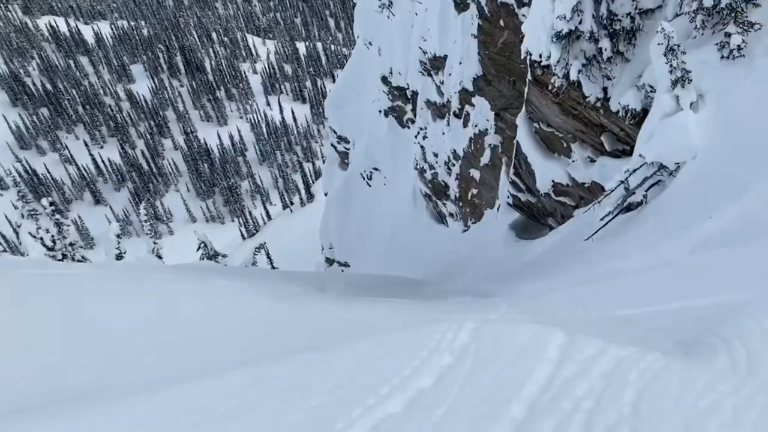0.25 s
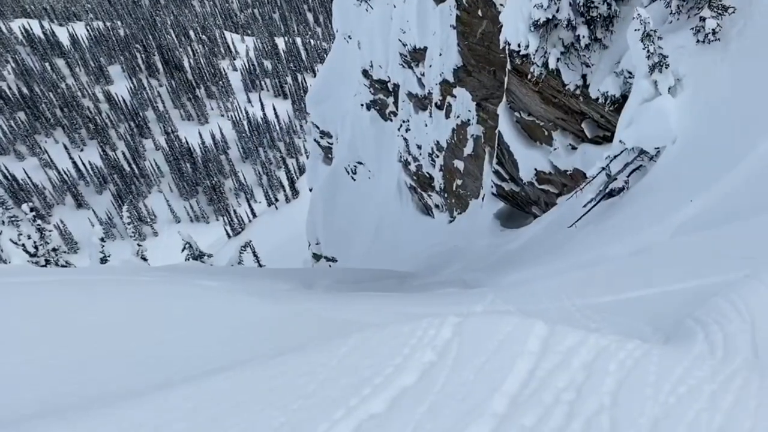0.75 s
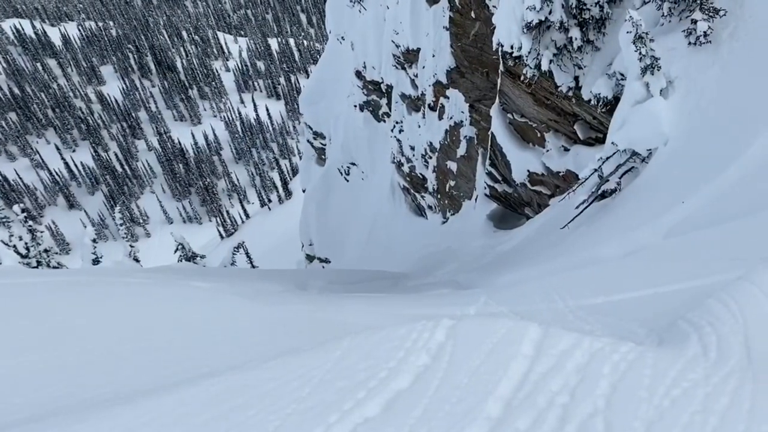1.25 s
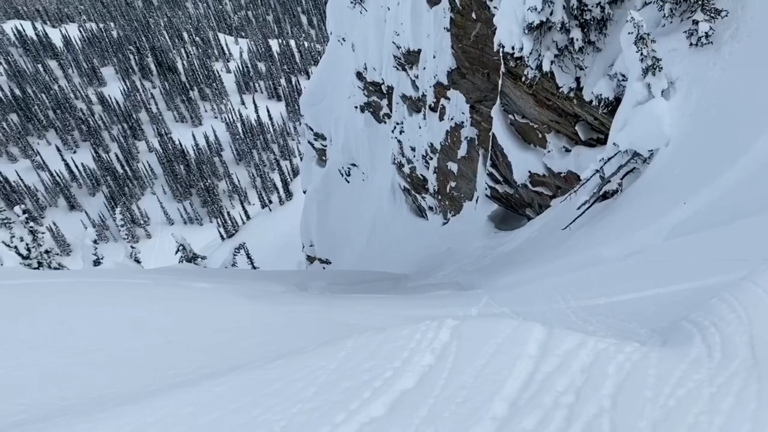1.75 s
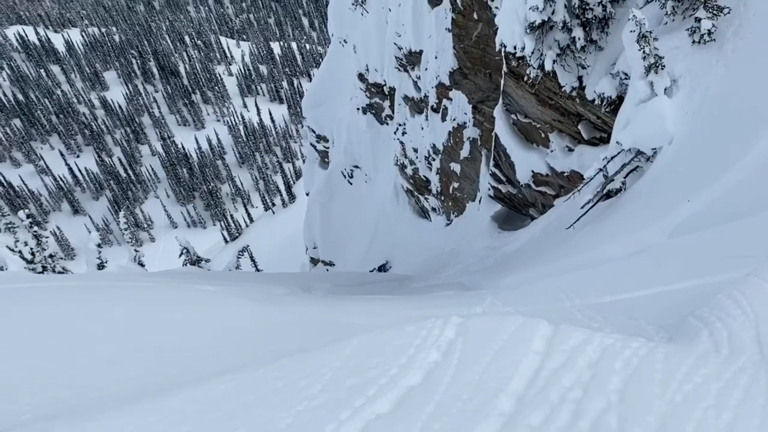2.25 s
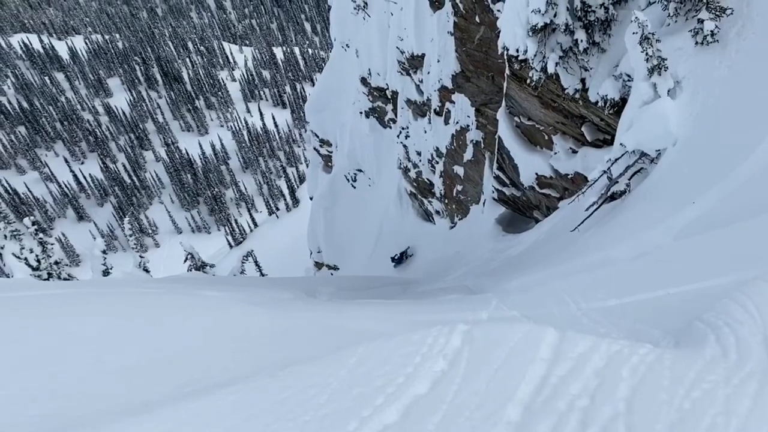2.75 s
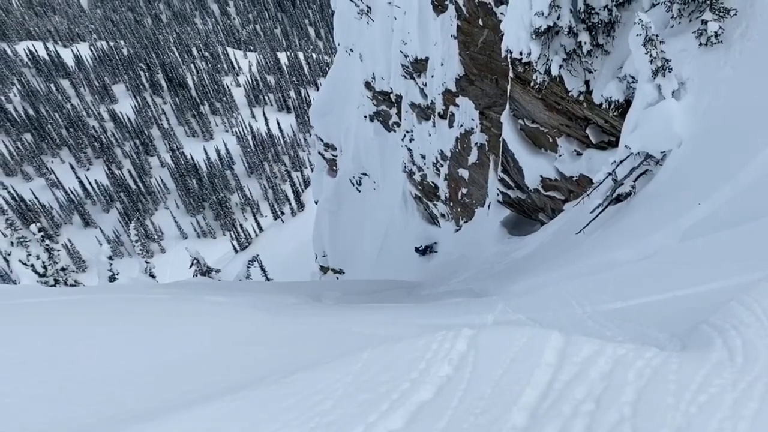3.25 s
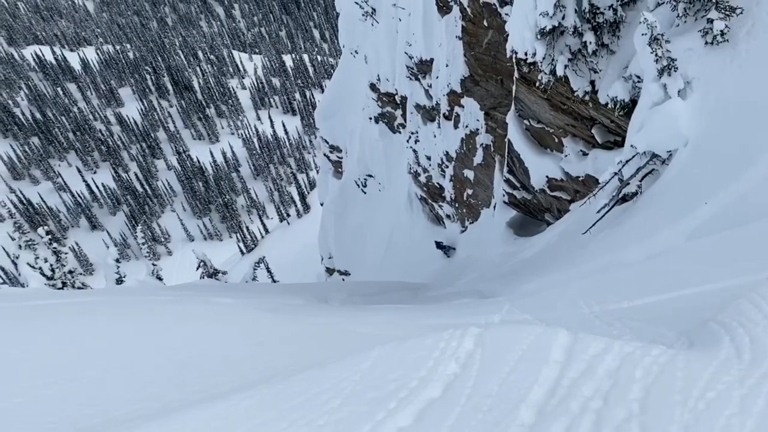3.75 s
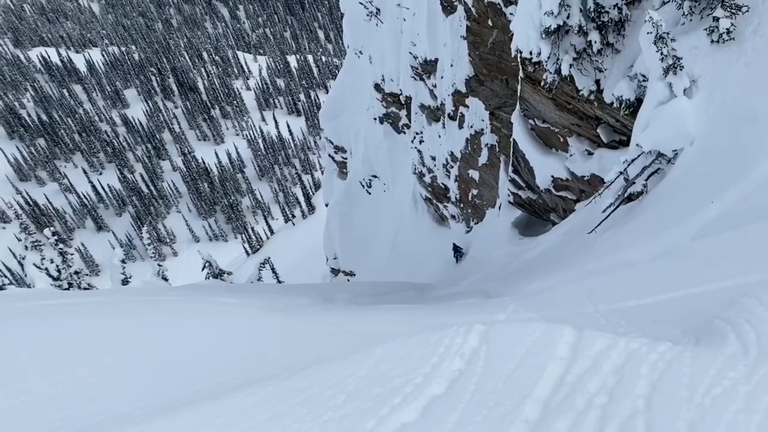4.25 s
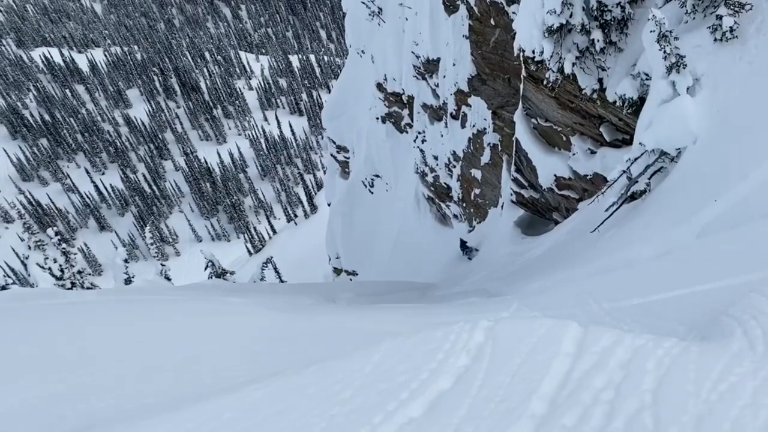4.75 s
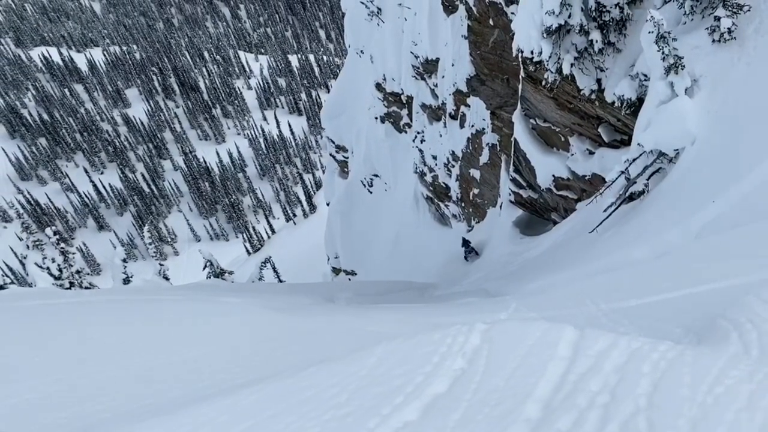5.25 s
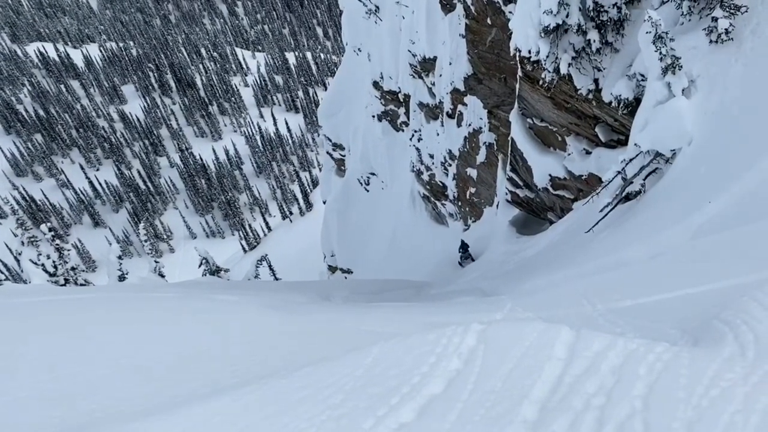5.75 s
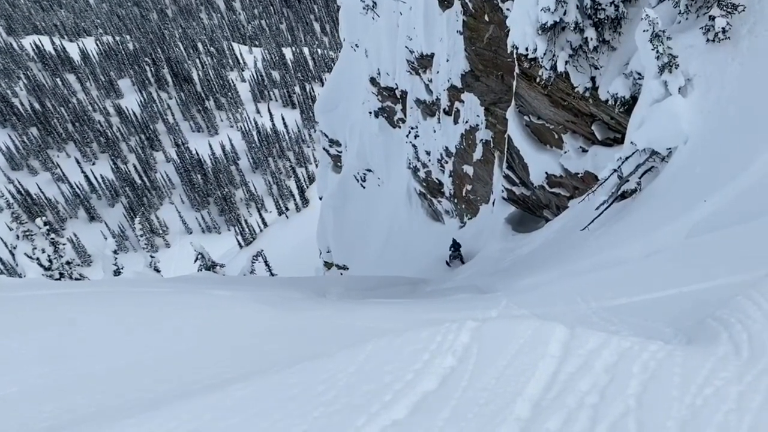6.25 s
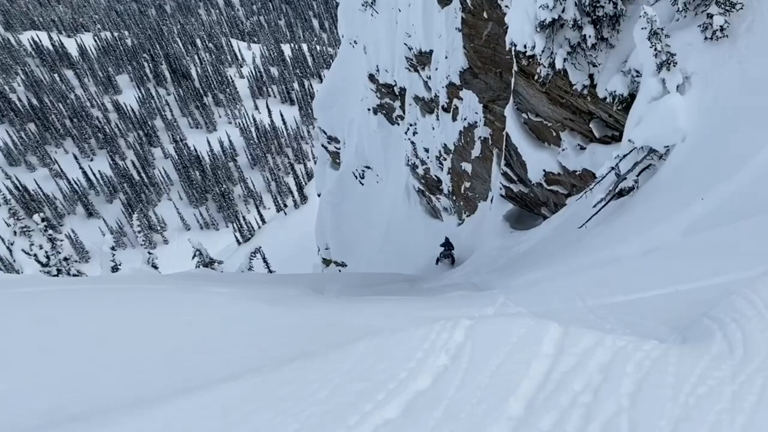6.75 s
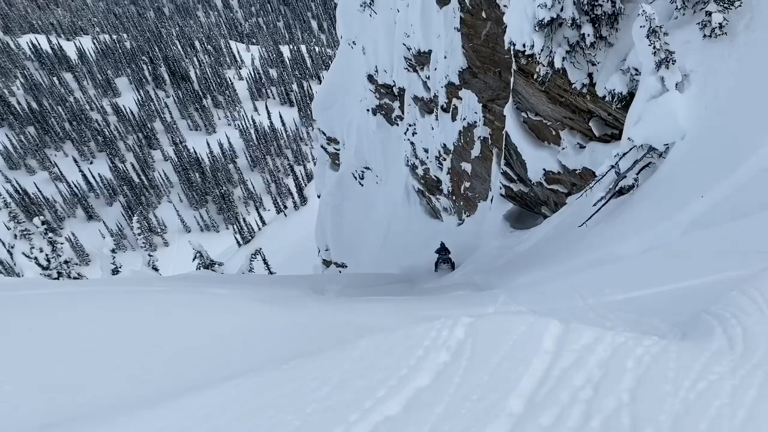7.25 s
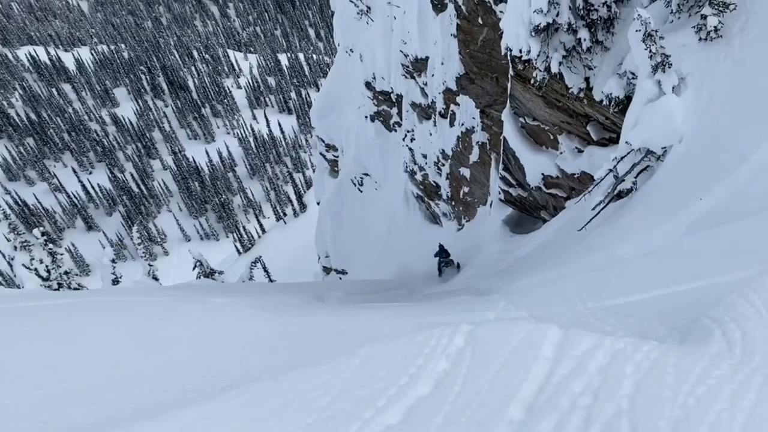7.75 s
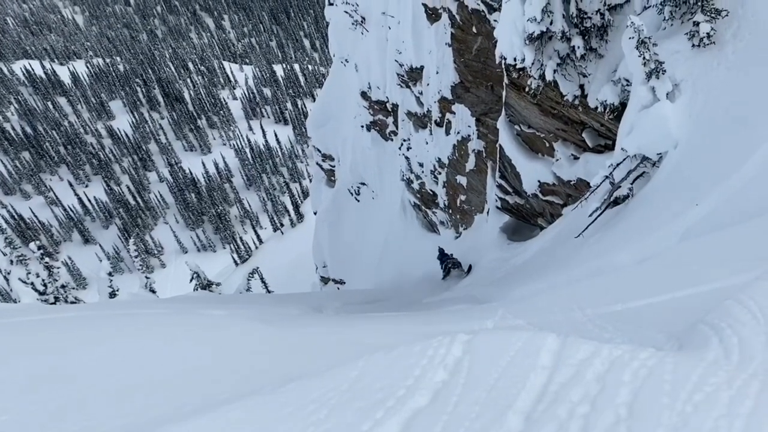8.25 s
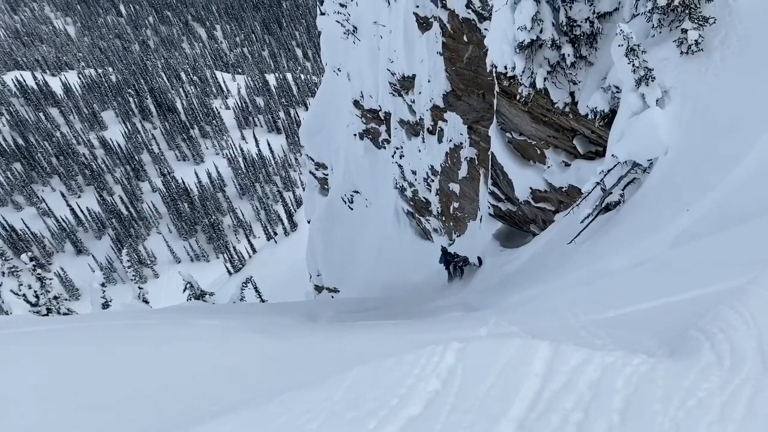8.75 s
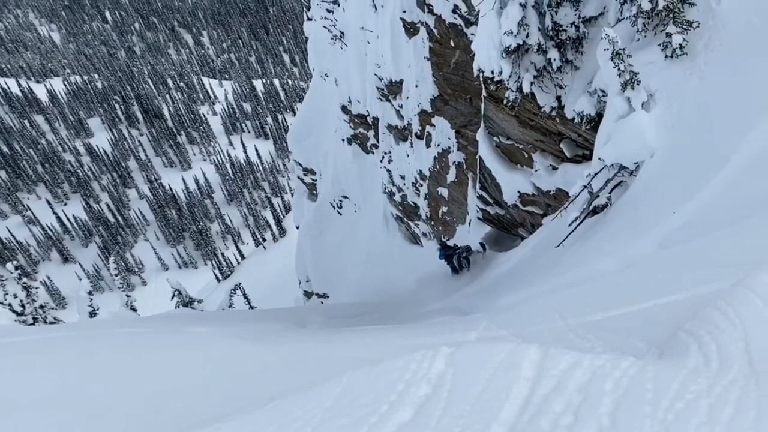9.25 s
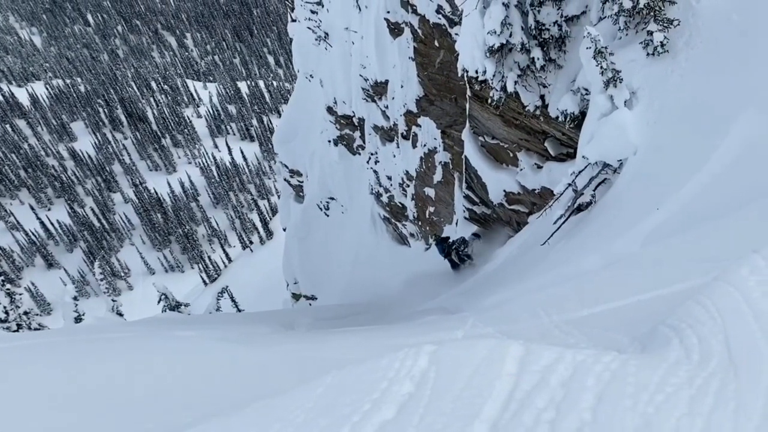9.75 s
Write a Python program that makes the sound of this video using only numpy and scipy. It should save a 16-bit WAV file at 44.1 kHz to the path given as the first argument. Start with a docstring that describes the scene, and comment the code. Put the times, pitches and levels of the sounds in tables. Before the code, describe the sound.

One continuous engine: a buzzing, nasal two-stroke scream heard from far off across a snowy gully. Its overtones flutter and fade in the moving air, with gritty exhaust noise and a faint track hum underneath. Brief dips in revs interrupt it throughout, each recovering quickly. A blurred echo off rock thickens the middle. Small low wind thumps touch the two-port microphone near the start.

```python
"""A snowy gully: a two-cylinder two-stroke snowmobile climbs at full revs, far below the listener.
Its exhaust is a periodic pulse train with gated gas noise; a rock face adds an echo, the track a hum of sines.
Unsteady air makes each overtone swell and fade before the sound reaches two close microphone ports.
Low-passed noise makes the light wind that thumps the ports."""
import sys
import numpy as np
from scipy import signal
from scipy.fft import rfft, irfft, next_fast_len
from scipy.io import wavfile
from scipy.ndimage import uniform_filter1d, map_coordinates

SR = 44100
rng = np.random.default_rng(int(sys.argv[2]) if len(sys.argv) > 2 else 0)


def wrap_up_sound(samples):
    """Save the sound to the file named by the first command line argument, as 16-bit audio."""
    columns = np.atleast_2d(samples).T
    # keep every value between -1 and 1, then stretch to whole-number steps
    tamed = np.clip(columns, -1, 1)
    steps = np.round(tamed * 32767).astype(np.int16)
    wavfile.write(sys.argv[1], SR, steps)


N = 441000  # samples, 10 s

# Exhaust arriving at open throttle:
# (time [s], pipe note near 800 Hz [dB], bark 1.2-3 kHz [dB], rasp above 3 kHz [dB])
EXHAUST = [(0.0, -39, -46, -44), (.6, -28.5, -41, -42), (.86, -25.5, -31.5, -42), (1.4, -16, -31, -42.5),
           (1.64, -13.5, -40, -44.5), (1.82, -27.5, -35, -43.5), (1.98, -15, -39, -43.5),
           (2.35, -34, -36.5, -37.5), (2.47, -28.5, -36, -34.5), (2.57, -27.5, -29.5, -27.5),
           (2.64, -17, -26, -23), (2.85, -18.5, -26.5, -25), (3.15, -15, -27, -28), (3.27, -26.5, -30, -34),
           (3.86, -24, -21.5, -28), (4.25, -31, -32.5, -31), (4.6, -40.5, -37.5, -36.5),
           (4.85, -37, -34, -37.5), (5.3, -27.5, -24.5, -22.5), (5.9, -28.5, -38.5, -36),
           (6.45, -27, -23.5, -24), (6.85, -21.5, -28.5, -24), (7.1, -34, -25.5, -22.5),
           (7.55, -29.5, -34.5, -31), (7.75, -30, -28, -26), (8.1, -26, -25, -26), (8.5, -26, -30, -25),
           (8.62, -23.5, -34, -33.5), (8.76, -28, -26, -33), (8.84, -29.5, -25.5, -26.5),
           (9.5, -27, -23.5, -31.5), (10.0, -17, -26, -30.5)]
# Pipe colour on top of those levels: (frequency [Hz], level per overtone [dB])
PIPE_COLOUR = [(1150, -2.5), (1300, -7), (2100, -6.5), (2900, -11), (3800, -5.5), (5900, -15.5),
               (8000, -27), (11500, -45.5), (14000, -39), (16000, -74)]
# Gas roar against the overtones: (frequency [Hz], level [dB])
GAS_ROAR = [(150, -29), (400, -24), (1000, -15.5), (2500, -12.5), (4200, -16), (6000, -8), (9000, 5)]
# Spectral shape of the wind rumble: (frequency [Hz], relative level per Hz [dB])
WIND_RUMBLE = [(20, -0.5), (50, 19), (100, -3.5), (170, -19.5), (500, -47.5)]
# Phase between the ports: (frequency [Hz], lead of the left [rad])
PORT_LEAD = [(100, 0), (690, .3), (1980, .2), (2670, 1.1), (4820, 2.1), (5430, 1.2), (7900, 3.05),
             (11800, np.pi), (14000, 4.2), (15300, 6.2)]
# Level between the ports: (frequency [Hz], left minus right [dB])
PORT_LEAN = [(60, 0), (200, -3), (700, -4.5), (1290, -1.8), (4400, -1), (6500, 0)]
# Part of the sound unrelated between the ports: (frequency [Hz], level [dB])
PORT_APART = [(200, -24), (3000, -19), (6000, -10), (8500, -22), (11500, -22), (13500, 2)]
# The firing note itself, the first overtone: (time [s], level [dB])
FIRING_NOTE = [(0.0, -41), (.2, -43.5), (.95, -33), (1.64, -33.5), (2.15, -46), (3.1, -38), (4.6, -42),
               (5.18, -40), (7.6, -36), (10.0, -33.5)]
# Firing rate that the open throttle pulls toward: (time [s], rate [Hz])
OPEN_RATE = [(0.0, 274.7), (0.21, 265.7), (0.78, 260.5), (0.94, 271.6), (1.39, 270.6), (1.95, 275.1),
             (2.38, 262.1), (2.7, 277.1), (2.87, 273.7), (3.01, 277.9), (3.36, 269.6), (3.92, 282.7),
             (4.29, 285.4), (5.12, 283.1), (5.28, 277), (5.5, 280.2), (5.9, 270.8), (6.56, 277.5),
             (7.75, 277.9), (8.3, 270.7), (8.71, 263), (9.36, 255.7), (9.9, 273.6)]
# The rider eases off or the track digs in:
# (time [s], length [s], sag of the firing rate [Hz], quietening of the exhaust [dB])
LIFTS = [(0.0, 0.1, 16.8, 9), (0.438, 0.059, 6.1, 7), (1.658, 0.07, 31.4, 15), (1.983, 0.063, 12, 10.5),
         (3.523, 0.11, 10.6, 4.5), (3.931, 0.14, 12.3, 3), (4.372, .17, 40, 9.5), (4.708, 0.1, 17, 13.5),
         (6.544, 0.14, 13.5, 9.5), (6.891, 0.26, 14, -0.5), (7.902, 0.087, 17.7, 17.5),
         (8.918, 0.08, 8.3, 9.5), (9.166, 0.11, 8, 6.5)]
# Overtones beside the pipe note: (time [s], second over the mean of note and bark [dB],
# fourth over the same mean [dB], fifth over the bark [dB])
BESIDE_NOTE = [(0, 4, -3, 15), (.4, -3, -12.5, 7.5), (.95, 3, 0.5, -7), (1.6, -6.5, -14.5, 4.5),
               (2.3, 2, -8, -5), (2.7, -3.5, -4, -6), (4.3, -4, 5, 1.5), (5.3, -4.5, -0.5, -2),
               (6, -9, -4.5, -7.5), (7.15, -7.5, -6.5, -3.5), (7.45, 2.5, -3.5, 1.5),
               (8.3, -14.5, -7, -2.5), (10, -6, -0.5, 4)]
# Upper colour: (time [s], 2.3-3.2 kHz over the mean of bark and rasp [dB], above 4.7 kHz over the rasp [dB])
UPPER_COLOUR = [(0, -2.5, -9), (1.3, 2.5, -0.5), (2.1, -0.5, -5.5), (2.7, 1.5, -3.5), (3.4, 1, -4.5),
                (4.4, 4, 9.5), (4.55, -11.5, -0.5), (5.1, 3, 3), (5.6, 7, 8.5), (7.4, -3, -1), (8.1, 2, 8),
                (9.3, 0.5, -5), (10, 3.5, 0)]
# Roughness: (time [s], gas roar below 1 kHz [dB], gas roar above [dB], phase drift of the upper overtones [rad])
ROUGHNESS = [(0, -4, 3, 2), (2.9, 0, 5.5, 1.5), (3.5, -3, 4, .5), (5, -5, 2, .15), (8.6, -6, 1.5, .15),
             (9.3, -4, 2, .7), (10, -3, 3, 1)]
# Hum of the track's drive lugs, at their own speed: (time [s], frequency [Hz], middle level [dB])
TRACK_HUM = [(.75, 120, -67), (.97, 131, -58), (1.7, 128, -54), (2.3, 110, -57.5), (3.17, 141.9, -54.5),
             (3.7, 115, -62.5), (4.4, 137.3, -64), (4.9, 117.6, -64.5), (5.65, 150.3, -54.5),
             (6.1, 125.5, -58), (7.0, 142.7, -65), (7.27, 126.4, -60), (7.9, 136.3, -56.5),
             (9.45, 121.3, -59), (10, 145.4, -50)]
# Harmonics of that hum, from the fundamental up: (level [dB])
LUG_HARMONICS = [0, 2, -10, -5]
# Echo from the rock face behind: (time [s], level against the straight sound [dB])
ROCK_ECHO = [(0, -21.5), (3.7, -17), (4.2, -7.5), (5.3, -11), (5.6, -14.5), (7.2, -10.5), (7.6, -14),
             (10, -17.5)]
# Flurries of wind on the ports: (time [s], length [s], middle level [dB], reach [Hz])
GUSTS = [(0, 0.18, -52, 90), (1.656, 0.54, -48, 190), (2.454, 0.45, -60, 100.7), (4.96, .5, -59, 100.6)]

RECOVER_S, LINGER_S = .319, .046  # the revs climb back; the hush outlasts the lift
CLOSE_S, OPEN_S = .048, .029  # the exhaust quietens, and returns
LOW_HUSH = .38  # share of the hush gained per overtone above the first
ROAR_HUSH = .62  # the gas roar loses only this share of the hush
NOTCH_HZ, NOTCH_WIDTH_HZ, NOTCH_DB = 4680, 216, 8  # a narrow gap in the treble
# echo: typical share of pitch lost, lag of its firing rate, loss per overtone above the third (up to three)
FLAT, LAG_S, DULL_DB = .028, .03, 2.5
FLUTTER = .5  # weight of the scattered sound in the three lowest tones
TOP_HZ = 15750
OVERTONES = 66
STFT = dict(nperseg=512, noverlap=384)


def amp(db):
    """Decibel law: the gain of a level in dB."""
    return 10 ** (np.asarray(db) / 20)


def unit(x):
    """Normalisation: x at rms 1."""
    return x / np.sqrt(np.mean(x ** 2) + 1e-20)


def along(points, hz):
    """Logarithmic pitch scale: (frequency, value) points read on a log axis."""
    f, v = np.transpose(points)
    return np.interp(np.log(hz + 1), np.log(f + 1), v)


def curves(rows, t):
    """Linear interpolation: each column after the time, read at times t."""
    s, *cols = np.transpose(rows)
    return np.array([np.interp(t, s, c) for c in cols])


def wobble(rate):
    """Band-limited fluctuation: a smooth random curve with rate knots a second."""
    knots = rng.standard_normal(int(N * rate / SR) + 4)
    return map_coordinates(knots, [np.arange(N) * rate / SR])


def overtone_wobble(size, rate, t):
    """Fluctuation over order and time: knots every size overtones and rate times a second."""
    each = np.arange(OVERTONES)[:, None] + 0 * t
    knots = rng.standard_normal((OVERTONES, 400))
    return map_coordinates(knots, [each / size, rate * t + 0 * each], order=1)


def filtered(x, response):
    """Linear filtering: the spectrum of x times a complex response of frequency."""
    m = next_fast_len(N + SR // 2)
    return irfft(rfft(x, m) * response(np.fft.rfftfreq(m, 1 / SR)), m)[..., :N]


def firing_rate(t):
    """Exponential recovery: each lift pulls the revs down steadily, then they climb back ever slower."""
    s, length, sag, _ = np.transpose(LIFTS)[:, :, None]
    fall = np.clip((t - s) / length, 0, 1)
    fall = fall * np.exp(-np.clip(t - s - length, 0, None) / RECOVER_S)
    return curves(OPEN_RATE, t)[0] - (sag * fall).sum(0)


def hush(t):
    """Throttled outflow: dB lost while the throttle is eased, as a quick drop, a hold and a return."""
    s, length, _, db = np.transpose(LIFTS)[:, :, None]
    closing = (t - s) / CLOSE_S
    opening = (s + length + LINGER_S - t) / OPEN_S
    return (db * np.clip(np.minimum(closing, opening), 0, 1)).sum(0)


def firings(turns, jitter_s, scatter_db):
    """Periodic impulses: one click per whole turn gives a harmonic series, each overtone near rms 1."""
    count = np.arange(1, int(turns[-1]))
    chance = rng.standard_normal((4000, 2))[:len(count)]
    at = np.interp(count, turns, np.arange(N))
    at += jitter_s[at.astype(int)] * SR * chance[:, 0]
    size = np.gradient(at) / np.sqrt(2) * amp(scatter_db * chance[:, 1])
    # a windowed sinc places each click between samples
    taps = np.floor(at)[:, None] + np.arange(-7, 9)
    off = taps - at[:, None]
    click = size[:, None] * np.sinc(off) * np.cos(np.pi * off / 16) ** 2
    return np.bincount(np.clip(taps, 0, N - 1).astype(int).ravel(), click.ravel(), N)


def rock_echo(t, ragged_s):
    """Doppler shift on reflection: the sled pulls away from the rock face, so its echo is flatter."""
    flatter = 1 - FLAT * amp(2 * wobble(3))
    turns = np.cumsum(flatter * firing_rate(t - LAG_S)) / SR
    return firings(turns, ragged_s, scatter_db=3)


def gas_noise(turns, rate):
    """Modulated turbulence: two noises, gated by each firing, with one overtone's power per overtone width."""
    gate = unit(.7 + np.exp(-3.5 * (turns % 1)))
    return gate * rng.standard_normal((2, N)) * np.sqrt(SR / 2 / rate)


def arriving_levels(hz, t, order):
    """Source-filter principle: dB of tone, echo and two roars, set by overtone order and pipe colour."""
    column = np.arange(len(t)) + 0 * order
    low, high, _ = curves(ROUGHNESS, t)
    third, bark, rasp = curves(EXHAUST, t)
    note_bark = (third + bark) / 2
    second, fourth, fifth = curves(BESIDE_NOTE, t) + [note_bark, note_bark, bark]
    middle, upper = curves(UPPER_COLOUR, t) + [(bark + rasp) / 2, rasp]
    # a dull moment loses the highest treble even more
    top = upper + .55 * (rasp - bark)
    centres = np.log([1, 2, 3, 4, 5, 7, 10, 14, 21, 36])  # overtone orders
    place = np.interp(np.log(order + 1e-9), centres, np.arange(10))

    def spread(*lowest_five):
        levels = np.array([*lowest_five, bark, middle, rasp, upper, top])
        return map_coordinates(levels, [place, column], order=1)

    # the lowest tones are quietened less
    eased = hush(t) * np.clip(LOW_HUSH * (order - 1), 0, 1)
    tone_db = spread(curves(FIRING_NOTE, t)[0], second, third, fourth, fifth) - eased
    dulling = DULL_DB * np.clip(order - 3, 0, 3)
    echo_db = tone_db + curves(ROCK_ECHO, t)[0] - dulling + .5 * eased
    # the roar is broad: its bass follows the low overtones together
    bass = (second + third + fourth + bark) / 4
    roar_db = spread(.5 * bass - 20, bass, bass, bass, bark) - ROAR_HUSH * eased
    roar_db = roar_db + low + (high - low) * np.clip(order - 3.5, 0, 1)
    notch = NOTCH_DB * np.exp(-((hz - NOTCH_HZ) / NOTCH_WIDTH_HZ) ** 2)
    colour = along(PIPE_COLOUR, hz) - notch
    return np.array([tone_db, echo_db, roar_db, roar_db]) + colour[:, None]


def through_air(tone, echo, roar, apart, scattered, patchy_db):
    """Multipath interference: eddies scatter the sound, so each overtone fades in and out on its own."""
    hz, t, z = signal.stft(np.array([tone, echo, roar, apart]), SR, **STFT)
    order = hz[:, None] / firing_rate(t)
    column = np.arange(len(t)) + 0 * order
    nearest = np.clip(np.round(order), 0, OVERTONES - 1).astype(int), column.astype(int)
    each = np.arange(OVERTONES)[:, None] + 0 * t
    smear = curves(ROUGHNESS, t)[2]

    def drift():
        slow = np.where(each > 5, .4 + .4 * smear, .8) * overtone_wobble(1, 7, t)
        medium = 1.1 * overtone_wobble(1, 17, t)
        fast = .7 * (each > 5) * overtone_wobble(2, 38, t)
        return slow + medium + fast

    # scattered paths add to the straight one with drifting size and phase, so lines swell and drop out
    share = np.clip(.8 + .35 * smear + .07 * hush(t), 0, 1.6)
    weight = scattered * np.where(each > 3, share, FLUTTER)
    z[0] *= (1 + weight * (drift() + 1j * drift()))[nearest]
    z[0] *= np.exp(1j * np.where(each > 5, smear, 1) * overtone_wobble(1, 3, t))[nearest]
    z[1] *= (1 + scattered * (drift() + 1j * drift()))[nearest]
    patches = (patchy_db * np.clip(each / 10, 0, 1) * overtone_wobble(3, 9, t))[nearest]
    spurts = (2.5 * (each > 4) * overtone_wobble(12, 30, t))[nearest]
    level_db = arriving_levels(hz, t, order) + patches
    level_db[2:] += spurts  # in the two roars only
    tone, echo, roar, apart = signal.istft(z * amp(level_db), SR, **STFT)[1][:, :N]
    return tone + echo + roar, apart


def pipe_delay(f):
    """Dispersion: the pipe holds the low tones back, so each pulse starts with its treble."""
    phase = .25 - 2 * np.pi * .0015 * 550 * np.arctan(f / 550)  # up to 1.5 ms of delay, less above 550 Hz
    return np.exp(1j * phase) * (f > 60)


def track():
    """Harmonic synthesis: the drive lugs give a wavering hum with a few overtones."""
    hz, db = curves(TRACK_HUM, np.arange(N) / SR)
    hz = uniform_filter1d(hz, SR // 5)
    phase = 2 * np.pi * np.cumsum(hz + wobble(9.9)) / SR
    hum = np.zeros(N)
    for k, lug_db in enumerate(LUG_HARMONICS, 1):
        hum += amp(db + lug_db + 3.5 * wobble(6)) * np.sqrt(2) * np.sin(k * phase)
    return hum


def engine():
    """Superposition: pulses, echo, gas roar and track; returns the common and the unrelated sound."""
    t = np.arange(N) / SR
    rate = firing_rate(t) * (1 + .0015 * wobble(30) + .0015 * wobble(11))
    turns = np.cumsum(rate) / SR
    # an eased engine fires raggedly
    ragged_s = 6e-6 + 4e-6 * curves(ROUGHNESS, t)[2] + 1.5e-6 * hush(t)
    pulses = firings(turns, ragged_s, scatter_db=.45)
    echo = rock_echo(t, ragged_s)
    gas = gas_noise(turns, rate)
    roar = filtered(gas[0], lambda f: amp(along(GAS_ROAR, f)))
    common, apart = through_air(pulses, echo, roar, gas[1], scattered=.42, patchy_db=2.6)
    unrelated = filtered(apart, lambda f: amp(along(PORT_APART, f)) * (f > 60))
    return filtered(common, pipe_delay) + track(), unrelated


def ports(common, apart):
    """Interaural-type differences: level and phase differ between the ports with frequency."""
    sign = np.array([[1], [-1]])  # left, right

    def tilt(f):
        return amp(sign * along(PORT_LEAN, f) / 2) * np.exp(.5j * sign * along(PORT_LEAD, f))

    return filtered(common, tilt) + filtered(apart, lambda f: tilt(f) * sign)


def wind():
    """Turbulent pressure noise: lumpy low buffeting with denser flurries, mostly alike on both ports."""
    t = np.arange(N) / SR
    both, own = unit(filtered(rng.standard_normal((2, N)), lambda f: amp(along(WIND_RUMBLE, f))))
    buffeting = amp(-72 + 3.3 * wobble(2.9) + 4.4 * wobble(11.0))
    air = buffeting * np.array([both + .15 * own, both - .19 * own])
    for s, length, db, hz in GUSTS:
        low_noise = filtered(rng.standard_normal((2, N)), lambda f: (f > 30) / (1 + (f / hz) ** 4))
        both, own = unit(low_noise)
        edges = np.clip(np.minimum(t - s, s + length - t) / .033, 0, 1)
        swell = edges * amp(db + 8.5 * wobble(28))
        air = air + swell * np.array([both + .3 * own, both - .3 * own])
    return air


def scene():
    """Superposition: engine and wind add at the two ports."""
    return ports(*engine()) + wind()


def record(dry):
    """Band limitation: nothing stays above TOP_HZ."""
    return filtered(dry, lambda hz: hz < TOP_HZ)


dry = scene()
out = record(dry)
wrap_up_sound(out)
```